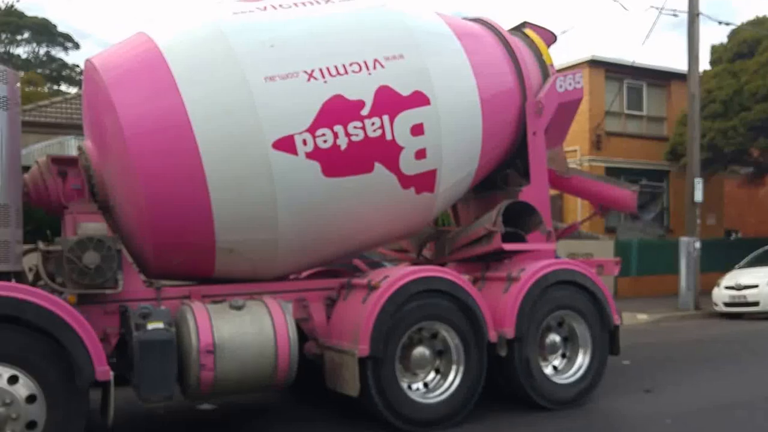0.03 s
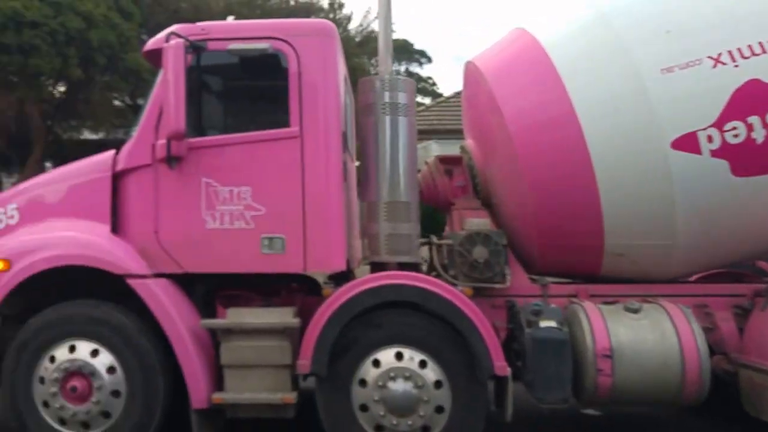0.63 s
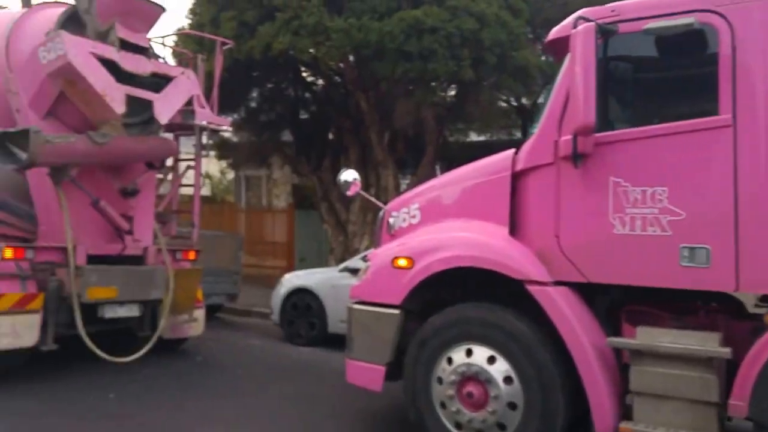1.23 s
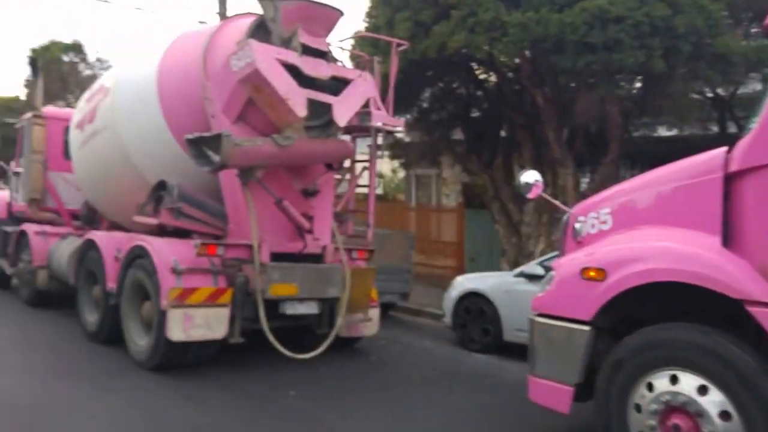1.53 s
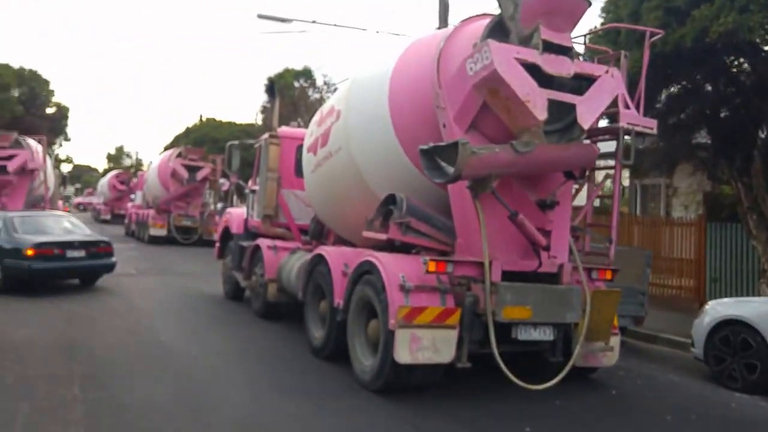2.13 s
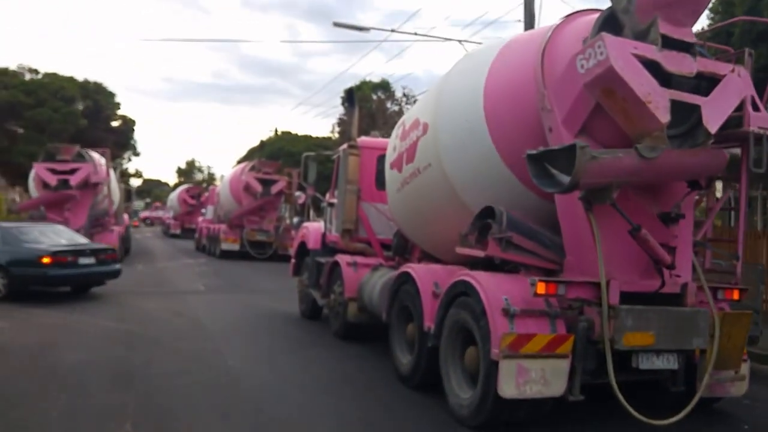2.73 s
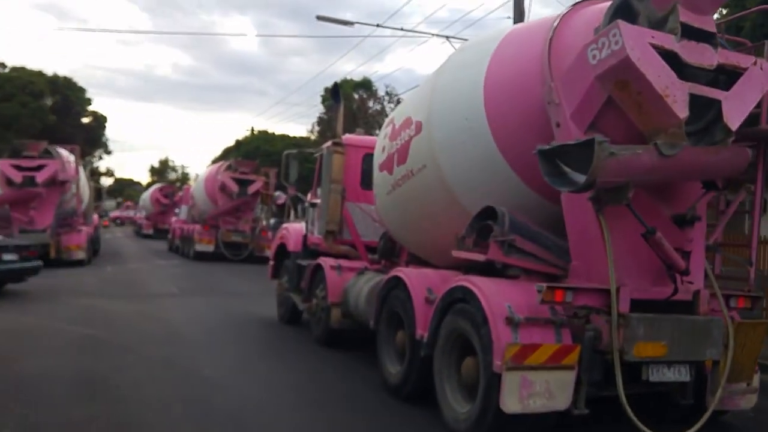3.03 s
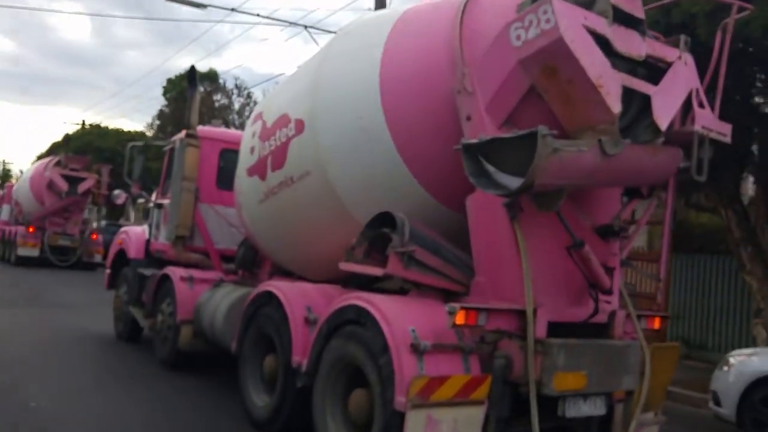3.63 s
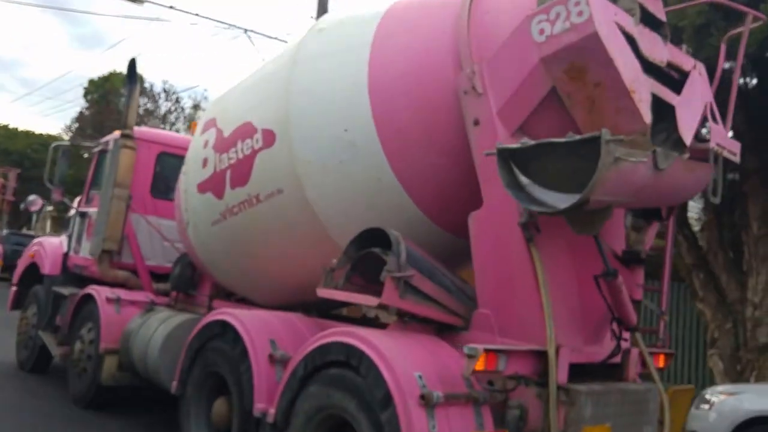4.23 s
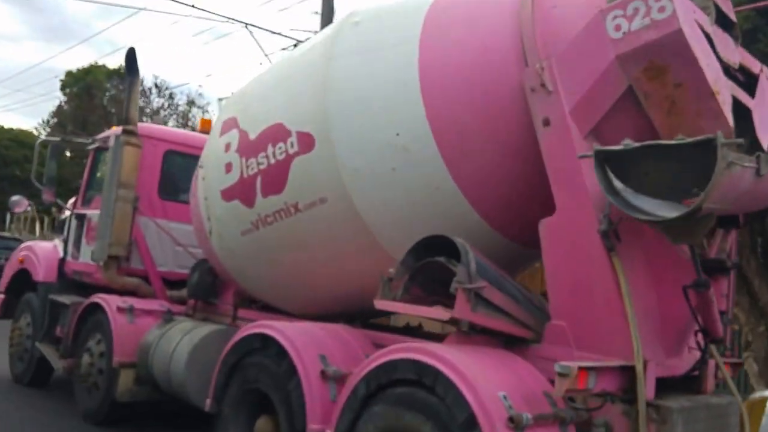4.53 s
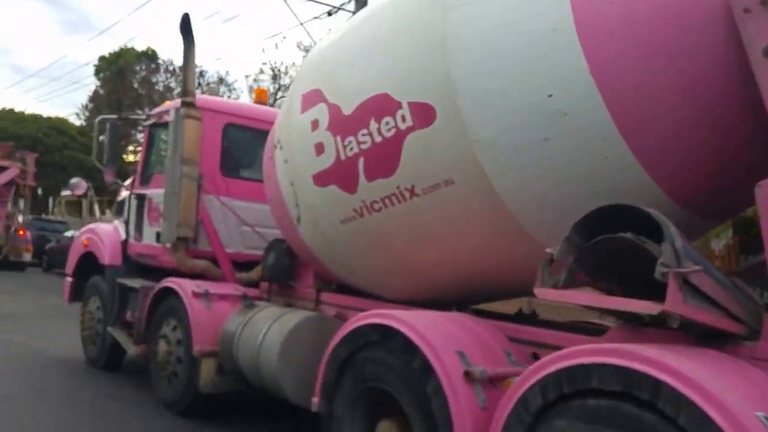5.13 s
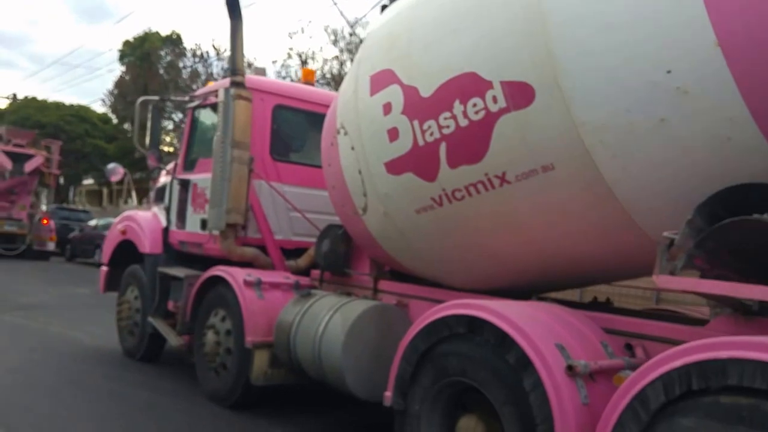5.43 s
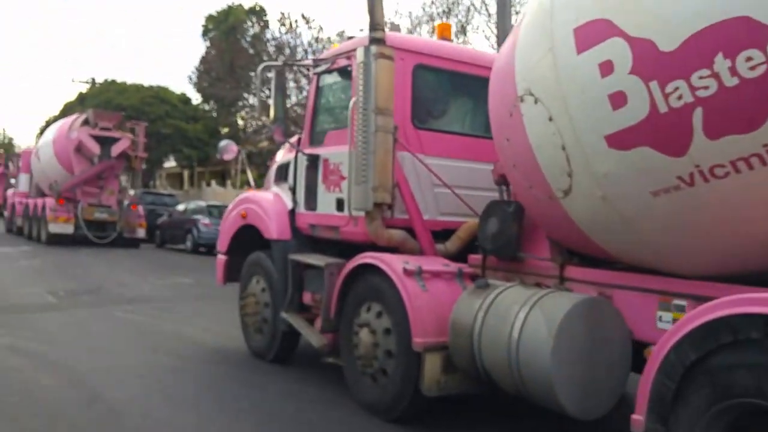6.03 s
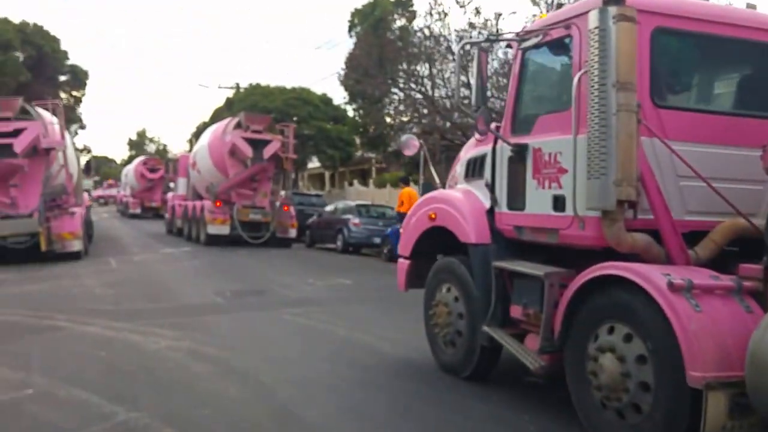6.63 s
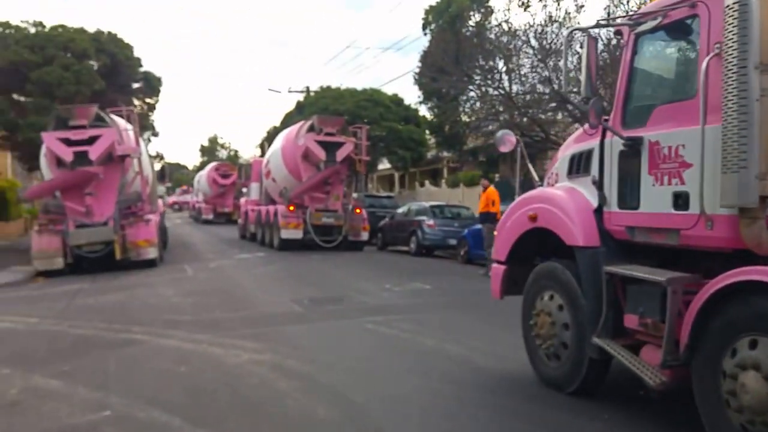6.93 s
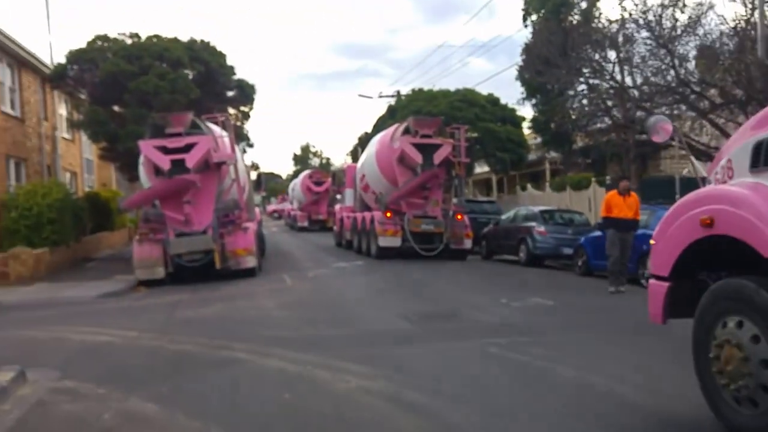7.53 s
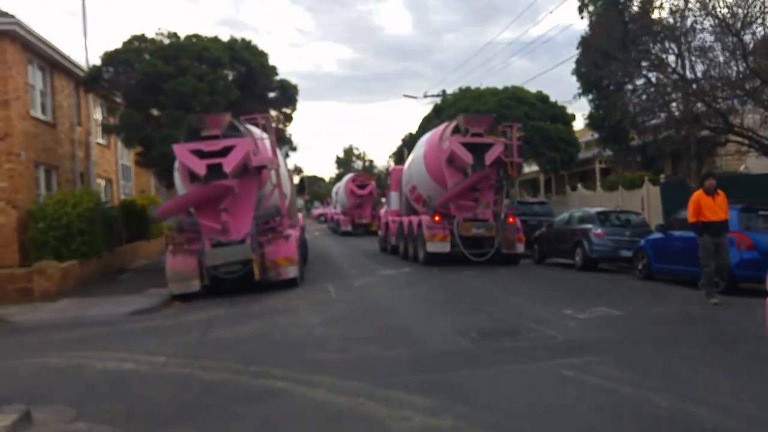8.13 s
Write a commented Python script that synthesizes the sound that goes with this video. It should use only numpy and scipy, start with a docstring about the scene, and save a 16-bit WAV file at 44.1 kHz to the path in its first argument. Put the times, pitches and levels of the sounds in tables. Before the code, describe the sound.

A row of concrete mixer trucks idles on a suburban street. After a brief silence, a steady low diesel drone and clatter fade in. The microphone moves slowly past two of them, so pump whines and fan hiss swell and recede. A few soft bumps and ticks come near the middle, then pulsing air hiss and deeper exhaust puffing. The engines ease slightly toward the end, with a faint metal squeak.

```python
"""Idling concrete mixer trucks

The microphone rolls slowly past two trucks of a row on a suburban street. Six-cylinder diesels drone
and clatter, drum drives and pumps whine in and out, fans and air hiss, metal squeaks briefly.
A few soft bumps and ticks reach the microphone; the sound fades in after a silent start."""
import sys
import numpy as np
from scipy import signal
from scipy.fft import rfft, irfft, next_fast_len
from scipy.io import wavfile

SR = 44100
rng = np.random.default_rng(int(sys.argv[2]) if len(sys.argv) > 2 else 0)


def file_out(sig):
    """Save sig as 16-bit WAV at sys.argv[1]."""
    # one column per channel
    cols = np.atleast_2d(sig).T
    # limit, then scale
    lim = np.clip(cols, -1, 1)
    pcm = np.round(lim * 32767).astype(np.int16)
    wavfile.write(sys.argv[1], SR, pcm)


N = 369558
T = np.arange(N) / SR
FFT_SIZE = next_fast_len(N, True)
BIN_HZ = np.maximum(np.arange(FFT_SIZE // 2 + 1) * SR / FFT_SIZE, 1)
FIRST_CRANK_HZ, SECOND_CRANK_HZ, FAR_CRANK_HZ = 10.11, 10.77, 11.64


def diesel(crank, decay_s, bed, rise_s=.0014, uneven_db=1, chance_db=1.8, repeat=.43):
    """Six firings in two turns rattle the block, partly alike each cycle. Returns rattle, envelope."""
    firing = (3 * crank).astype(int)
    since_s = (3 * crank % 1) / (3 * np.gradient(crank) * SR)
    weakness = unit_rms(signal.detrend(rng.standard_normal(6), type="constant"))
    chance = rng.standard_normal(firing[-1] + 1)
    strength = from_db(chance_db * chance[firing] - uneven_db * weakness[firing % 6])
    beat = unit_rms(bed + strength * (1 - np.exp(-since_s / rise_s)) * np.exp(-since_s / decay_s))
    cycle = rng.standard_normal(int(2 * N / (crank[-1] - crank[0])))
    repeating = cycle[(crank / 2 % 1 * len(cycle)).astype(int)]
    rattle = np.sqrt(repeat) * repeating + np.sqrt(1 - repeat) * rng.standard_normal(N)
    return beat * rattle, beat


# t/s, left lag of first truck/ms, of second/ms, power share of second
TRUCK_BEARINGS = [(.6, -0.08, -0.27, 0.27), (1.2, 0.24, -0.046, 0.47), (1.9, 0.47, -0.27, 0.03),
                  (3.2, 0.48, -0.078, 0.05), (4.7, 0.44, -0.17, 0.33), (6, 0.41, -0.011, 0.52),
                  (7, 0.51, 0.34, 0.83), (8.38, 0.43, 0.4, 0)]

def near_trucks(first, second):
    """Direct sound of two engines, shifting in bearing and balance."""
    first_ms, second_ms, share = curves(TRUCK_BEARINGS)
    return np.sqrt(1 - share) * lag_left(first, first_ms) + np.sqrt(share) * lag_left(second, second_ms)


def far_trucks():
    """The rest of the row and the echoes: two rattles from all sides."""
    rattles = [diesel(turns(hz), decay_s=.0044, bed=2.7)[0] for hz in (FAR_CRANK_HZ, FIRST_CRANK_HZ)]
    return diffuse(np.array(rattles))


# Loudness along the row: t/s, level/dB
ROW_LOUDNESS = [(0.83, -19), (1.8, -17), (2.7, -21.5), (3.2, -19), (4.0, -19.5), (5.5, -20), (6.3, -18.5),
                (6.95, -20.5), (7.3, -25.5), (7.9, -21), (8.38, -23.5)]

def engine_gain(mean_db, follow):
    """Gain that follows a share of the loudness swing along the row."""
    row_db, = curves(ROW_LOUDNESS)
    return from_db(mean_db + follow * (row_db - row_db.mean()))


# f/Hz, level/dB
ROAR_SPECTRUM = [(400, -64), (520, -19), (560, -6), (600, -1), (670, 2), (730, 1), (790, 2.5), (860, 0.5),
                 (950, -1.5), (1100, -5), (1300, -20), (1800, -37)]

def panel_roar(direct, street, beat, pulse=.65):
    """Panels roar; the echoed part pulses with the firing."""
    echo = street * (1 + pulse * (beat - 1))
    return engine_gain(-22, follow=.86) * coloured(echo + .85 * direct, ROAR_SPECTRUM)


# f/Hz, level/dB
RUMBLE_SPECTRUM = [(90, -22.5), (170, -16.5), (205, -3.5), (255, -8.5), (310, -4), (350, -2.5), (420, -2),
                   (470, -7.5), (515, -11), (600, -31)]

def block_rumble(direct, street):
    """Low rattle of the engine blocks."""
    return engine_gain(-27.5, follow=.97) * coloured(street + .56 * direct, RUMBLE_SPECTRUM)


# f/Hz, level/dB
KNOCK_SPECTRUM = [(900, -38), (1200, -5.5), (1400, -2.5), (1650, 0.5), (1900, 1.5), (2200, -1.5),
                  (2600, -3.5), (3000, -11.5), (3300, -12), (3700, -20.5), (4500, -21), (7000, -24)]
# t abreast/s, half-length/s, boost/dB
OPEN_ARCHES = [(1.033, 0.53, 3.5), (6.05, 0.81, 1.5)]

def injector_knock(direct, street):
    """Injectors knock, louder abreast of an open wheel arch."""
    arch_db = sum(db * nearness(T, at_s, half_s) for at_s, half_s, db in OPEN_ARCHES)
    return engine_gain(-28.5 + arch_db, follow=.59) * coloured(street + .75 * direct, KNOCK_SPECTRUM)


# f/Hz, width/Hz, far level/dB, passes (t/s, half-length/s, level/dB)
COVER_MODES = [(1610, 35, -68, [(1.0, 0.26, -43.5)]), (1805, 42, -53, [(3, 0.8, -44.5), (4.95, 0.63, -38.5),
               (5.88, .17, -34.5), (6.45, 0.26, -37.5), (8, .45, -40)]), (2074, 30, -55, [(.94, .22, -31.5),
               (1.84, .19, -35.5), (3.3, 0.36, -43.5)]), (4700, 80, -70, [(.95, .12, -42),
               (1.72, .15, -47)])]
BODY_SHADOW = 9.3  # steepness of hiding by bodywork; 2 = in the open

def cover_rings(clatter):
    """Engine covers ring at their own pitches under the clatter."""
    out = np.zeros((2, N))
    for hz, width_hz, far_db, passes in COVER_MODES:
        mode = signal.iirpeak(hz, hz / width_hz, fs=SR)
        ring = signal.lfilter(*mode, signal.lfilter(*mode, clatter))
        out += passing(far_db, passes, BODY_SHADOW) * unit_rms(ring)
    return out


# crank order, relative level/dB
EXHAUST_ORDERS = [(3, -25), (4, -7), (5, -20), (6, 5), (7, -28), (8, -26.5), (9, -4), (10, -26), (12, -5),
                  (13, -27), (15, -10.5), (19, -14)]

def exhaust_drone(crank, waver=.029):
    """Low crank orders, nearly pure, wavering as reflections shift."""
    tones = sum(from_db(db) * (1 + waver * drift(1.1)) * np.cos(2 * np.pi * (k * crank + rng.random()))
                for k, db in EXHAUST_ORDERS)
    return passing(-45.5, [(2.4, 2, -40), (8.3, .76, -36)]) * np.sqrt(2) * tones


# f/Hz, level/dB
PUFF_SPECTRUM = [(22, -24), (42, 3.5), (60, -8), (90, -1), (130, -9.5), (180, -12), (300, -14)]

def exhaust_puffs(direct, street):
    """Deep, noisy puffing of exhaust gas."""
    gas = street + .16 * direct + .51 * rng.standard_normal((2, N))
    return passing(-39, [(4.8, .45, -39), (6.3, .52, -30)]) * coloured(gas, PUFF_SPECTRUM)


# Idle surges: depth/share of speed, period/s, crest t/s
QUICK, SLOW = (.0055, .527, 4.8), (.0035, .73, 1.75)
# f/Hz, unsteady share, width/Hz, left lag/ms, far level/dB, surge, passes (t/s, half-length/s, level/dB)
WHINE_TONES = [(202.7, .2, 3, -.1, -43.5, SLOW, [(1.1, 0.44, -37), (4.8, .8, -36)]),
               (232.6, 0.15, 3, -0.18, -37, QUICK, [(3.6, 0.48, -33.5), (4.44, 0.27, -27),
               (5.55, 0.45, -26.5), (5.82, 0.19, -24.5), (6.27, 0.24, -29), (8.05, 0.18, -34.5)]),
               (304, 0.2, 4, -0.18, -49, SLOW, [(1.85, 0.55, -33)]),
               (311.4, 0.16, 4, -0.11, -42, SLOW, [(5.1, 1, -39.5)]),
               (393.4, 0.07, 5, 0.37, -42, QUICK, [(2.35, 0.29, -28), (3.5, 0.69, -26.5),
               (4.85, 0.26, -28.5), (6.3, 0.62, -33)]),
               (405.8, 0.1, 5.6, 0.48, -42, SLOW, [(1.5, 0.83, -31), (3.3, 0.77, -30), (5.4, 1.4, -33)]),
               (433, .25, 5, 0.44, -52, SLOW, [(3.7, 1.8, -38)]),
               (463.5, 0.061, 3.4, 0.41, -35, QUICK, [(.88, 0.097, -28), (1.38, 0.15, -31),
               (2, 0.24, -31.5), (2.6, 0.21, -27.5), (4.45, 0.53, -34), (5.35, 0.34, -29),
               (6.65, 0.28, -30.5), (7.42, 0.42, -26.5), (8.33, 0.17, -30.5)]),
               (497, 0.21, 5, 0.61, -54, QUICK, [(6.75, 0.29, -35), (8, 0.15, -35.5)]),
               (608.7, 0.24, 3.5, 0.29, -40, SLOW, [(1.15, 0.41, -32), (1.8, 0.28, -30), (3.15, 0.49, -31),
               (4.55, 0.13, -34)]), (635, 0.4, 6.9, 0.31, -42, QUICK, [(6.9, 0.21, -32), (8.3, 0.1, -30)]),
               (666, 0.26, 10, 0.27, -34.5, QUICK, [(5.35, 0.32, -31), (6.55, 0.28, -27.5),
               (7.65, 0.14, -32)]), (701, 0.28, 4.5, 0.13, -40, QUICK, [(3.42, 0.15, -29.5),
               (4.8, 0.11, -28), (5.9, 0.56, -36), (6.92, 0.11, -26)]),
               (785, 0.26, 6.1, 0.13, -52, SLOW, [(1.1, 0.47, -28.5)]),
               (811.5, 0.17, 6.5, 0.32, -42, SLOW, [(1.25, 0.28, -26.5), (2.3, 0.81, -22),
               (4.35, 0.31, -27), (4.95, 0.15, -28.5), (6.1, 0.38, -33), (6.6, 0.085, -31)]),
               (900, 0.06, 3.9, 0.25, -43, QUICK, [(2.05, 0.47, -34.5), (5.5, 0.97, -29.5)]),
               (4240, 1, 110, 0.24, -68, QUICK, [(6.72, 0.14, -43)]),
               (5230, 1, 59, 0.19, -61, QUICK, [(7.4, 0.5, -48.5)])]

def whines(crank, flutter_rad=.43, fading_db=1.8, fading_hz=.92):
    """Pump, gear and fan tones, shaken by the engine cycle; reflections make far ones fade in and out."""
    out = np.zeros((2, N))
    for hz, unsteady, width_hz, lag_ms, far_db, surge, passes in WHINE_TONES:
        gain = passing(far_db, passes, BODY_SHADOW)
        gain *= from_db(fading_db * (1 - gain / gain.max()) * drift(fading_hz))
        reflections = unit_rms(drift(width_hz) + 1j * drift(width_hz))
        amplitude = np.sqrt(1 - unsteady ** 2) + unsteady * reflections
        phase = 2 * np.pi * turns(hz * whine_pitch(surge, passes), hunting=.00097)
        phase += flutter_rad * np.sin(np.pi * crank + 2 * np.pi * rng.random())
        tone = np.sqrt(2) * gain * amplitude * np.exp(1j * phase)
        sway = .23 * min(hz / 1000, 1) * drift(2)
        left = tone * np.exp(-2j * np.pi * hz * lag_ms / 1000)
        out += [left.real * (1 + sway), tone.real * (1 - sway)]
    return out


def whine_pitch(surge, passes, doppler_shift=.0035, doppler_s=1.2):
    """Relative pitch: surges with the engine, bends down through the loudest pass."""
    depth, period_s, crest_s = surge
    abreast_s = max(passes, key=lambda row: row[2])[0]
    past = (T - abreast_s) / doppler_s
    doppler = doppler_shift * 2 * past / (1 + past ** 2)
    return 1 + depth * np.cos(2 * np.pi * (T - crest_s) / period_s) - doppler


def airflow(beat, pulse=.48, flicker_db=.88):
    """Diffuse air noise, pulsing gently with the firing."""
    noise = diffuse(rng.standard_normal((2, N)))
    return noise * (1 + pulse * (beat - 1)) * from_db(flicker_db * drift(13))


# f/Hz, level/dB
HISS_SPECTRUM = [(2500, -3), (3300, -5), (3700, -5.5), (4600, -3.5), (5600, -2.5), (6600, -2.5),
                 (7400, -1.5), (7750, -10.5), (8200, -8.5), (9200, -21.5), (11000, -50)]
SPRAY_SPECTRUM = [(6000, -19), (8500, 1), (9700, 0.5), (11000, -2.5), (13000, -5.5), (16000, -10)]

def fans(air, direct):
    """Fan hiss with reflections, topped by a fainter, brighter spray of noise."""
    gain = passing(-34, [(1.05, .45, -32), (1.8, .56, -33), (6.68, .27, -30), (8.15, 1, -33.5)])
    hiss = with_reflections(coloured(air + .055 * direct, HISS_SPECTRUM))
    spray = from_db(-9) * coloured(air + .34 * direct, SPRAY_SPECTRUM)
    return gain * (hiss * pan(.8) + spray * pan(-1))


# f/Hz, level/dB
JET_SPECTRUM = [(4500, -14), (5500, -7), (6500, 0.5), (7400, -1.5), (7800, -13), (9000, -14)]
# t/s, half-length/s, level/dB
COMPRESSOR_PASSES = [(3.75, 0.12, -35), (4.5, 0.86, -33), (5.33, 0.1, -33), (5.95, 0.44, -35.5),
                     (6.3, 0.13, -33.5)]

def compressor_jet(crank, surge_db=2.4):
    """An air jet surges once a turn with the compressor stroke."""
    stroke = from_db(surge_db * np.cos(2 * np.pi * crank) + .5 * drift(11))
    return passing(-56, COMPRESSOR_PASSES) * stroke * coloured(rng.standard_normal((2, N)), JET_SPECTRUM)


# f/Hz, level/dB
LEAK_SPECTRUM = [(9500, -20), (11300, -1), (13000, 0), (14200, -4), (16000, -7)]

def air_leak(air):
    """Thin sizzle of air escaping behind the second cab."""
    return passing(-75, [(5.85, .22, -56), (6.3, .12, -50)]) * coloured(air, LEAK_SPECTRUM)


# t/s, level/dB, f/Hz, half-length/s, left minus right/dB
MIC_JOLTS = [(2.809, -24, 76, 0.0067, -16), (3.339, -22, 232, 0.014, 0), (3.551, -10, 120.7, 0.0095, 3),
             (3.592, -22, 130, 0.0071, 2), (3.987, -11.5, 98, 0.0038, 8), (4.012, -18, 70, 0.011, -2),
             (4.065, -24, 85, 0.022, -2), (4.117, -22, 105, 0.0083, 3)]

def bumps():
    """Soft jolts of the microphone: a low swing of a cycle or two."""
    out = np.zeros((2, N))
    for at_s, db, hz, half_s, pan_db in MIC_JOLTS:
        near = np.abs(T - at_s) < .1
        t = T[near] - at_s
        out[:, near] += from_db(db) * pan(pan_db) * np.exp(-(t / half_s) ** 2) * np.cos(2 * np.pi * hz * t)
    return out


# t/s, level/dB, f/Hz, half-length/s, relative half-bandwidth; puffs of air, and at 8.22 s a brief rattle
NOISE_BURSTS = [(1.17, -27.5, 7260, 0.011, .25), (1.19, -29, 8100, .003, .08),
                (4.552, -27, 7200, 0.0064, .045), (4.639, -23, 7200, .004, 0.044),
                (4.733, -25, 7100, 0.0058, 0.065), (3.27, -35.5, 5000, 0.11, 0.32),
                (6.232, -30, 7300, 0.018, 0.39), (6.3, -41, 3950, .13, .04), (7.868, -29, 4600, 0.0089, 0.17),
                (8.12, -42, 3600, 0.16, .06), (8.22, -31.5, 2580, 0.079, .14)]
# t/s, level/dB
DRY_TICKS = [(3.170, -35), (3.380, -26), (3.503, -33), (3.671, -27)]

def spits_and_ticks(tick_hz=12400, tick_half_s=.0005):
    """Short puffs of air, a brief rattle and tiny dry ticks: bursts of band noise."""
    out = np.zeros((2, N))
    ticks = [(at_s, db, tick_hz, tick_half_s, .14) for at_s, db in DRY_TICKS]
    for at_s, db, hz, half_s, width in list(NOISE_BURSTS) + ticks:
        near = np.abs(T - at_s) < .2
        band = signal.butter(2, hz * np.exp([-width, width]), "band", fs=SR, output="sos")
        noise = unit_rms(signal.sosfilt(band, rng.standard_normal((2, near.sum()))))
        out[:, near] += from_db(db) * np.exp(-((T[near] - at_s) / half_s) ** 2) * noise
    return out


# t/s, f/Hz, half-length/s, level/dB
METAL_SQUEAKS = [(.712, 8330, .042, -31.5), (7.78, 9030, .025, -43), (7.98, 350, .14, -29)]

def squeaks():
    """Metal squeaks and groans in brief, wavering tones."""
    clock_s = np.cumsum(1 + .0028 * drift(32)) / SR
    return sum(from_db(db) * np.exp(-((T - at_s) / half_s) ** 4) * np.sin(2 * np.pi * hz * clock_s)
               for at_s, hz, half_s, db in METAL_SQUEAKS)


def turns(hz, hunting=.002):
    """Running turn count under a governor that hunts a little."""
    return np.cumsum(hz * (1 + hunting * drift(.8))) / SR + 2 * rng.random()


def nearness(t, at_s, half_s, shadow=2):
    """Gain of a passed machine: 1 abreast, one half at half_s either side."""
    return 1 / (1 + np.abs((t - at_s) / half_s) ** shadow)


def passing(far_db, passes, shadow=2):
    """Gain: the far level and each pass (t/s, half-length/s, level/dB) add in power."""
    t = T[::100]
    swells = sum((from_db(db) * nearness(t, at_s, half_s, shadow)) ** 2 for at_s, half_s, db in passes)
    return np.interp(T, t, np.sqrt(from_db(far_db) ** 2 + swells))


def with_reflections(pair, gain=.25, detour_s=.003, sway=.1158):
    """Road and truck flank reflect; the detours change as the microphone moves."""
    delays_s = [detour_s * path * (1 + sway * drift(.3)) for path in (1, 2.3)]
    echoes = np.array([sum(np.interp(T - delay, T, port) for delay in delays_s) for port in pair])
    return unit_rms(pair + gain * echoes)


def diffuse(pair, port_spacing_s=.00053):
    """Sound from all sides: alike at both microphone ports only for long waves."""
    alike = np.sinc(2 * BIN_HZ * port_spacing_s)
    mid, side = irfft(rfft(pair, FFT_SIZE) * np.sqrt([1 + alike, 1 - alike]), FFT_SIZE)[:, :N]
    return unit_rms(np.array([mid + side, mid - side]))


def lag_left(x, lag_ms):
    """Stereo pair with the left port delayed."""
    return np.array([np.interp(T - lag_ms / 1000, T, x), x])


def pan(left_minus_right_db):
    """Left and right gains."""
    return from_db(np.array([[.5], [-.5]]) * left_minus_right_db)


def coloured(x, spectrum):
    """Filter by an (f/Hz, level/dB) table; unit power."""
    hz, db = np.transpose(spectrum)
    gain = from_db(np.interp(np.log(BIN_HZ), np.log(hz), db, left=-80, right=-80))
    return unit_rms(irfft(rfft(x, FFT_SIZE) * gain, FFT_SIZE)[..., :N])


def drift(hz, hop=100, settle=1000):
    """Random wander of spread 1, changing about hz times a second."""
    pole = np.exp(-2 * np.pi * hz * hop / SR)
    noise = rng.standard_normal(N // hop + settle + 2)
    slow = signal.lfilter([1], [1, -2 * pole, pole * pole], noise)[settle:]
    return np.interp(np.arange(N) / hop, np.arange(len(slow)), unit_rms(slow))


def curves(rows):
    """Columns of a (t/s, ...) table, per sample."""
    times_s, *columns = np.transpose(rows)
    return [np.interp(T, times_s, column) for column in columns]


def from_db(db):
    return 10 ** (np.asarray(db) / 20)


def unit_rms(x):
    return x / np.sqrt(np.mean(np.abs(x) ** 2) + 1e-20)


def scene():
    """Two near diesels heard directly, the rest of the row and its echoes from every side."""
    crank = turns(SECOND_CRANK_HZ)
    first, first_beat = diesel(turns(FIRST_CRANK_HZ), decay_s=.0099, bed=.9)
    second, second_beat = diesel(crank, decay_s=.0048, bed=1)
    direct = near_trucks(first, second)
    street = far_trucks()
    air = airflow(second_beat)
    jet = compressor_jet(crank)
    low_end = exhaust_puffs(direct, street) + block_rumble(direct, street)
    clatter = panel_roar(direct, street, first_beat) + injector_knock(direct, street)
    clatter += cover_rings(street + direct)
    hiss = jet + fans(air, direct) + air_leak(air)
    tones = exhaust_drone(crank) + whines(crank) * pan(2.2)
    return clatter * pan(1.8) + low_end + tones + hiss + bumps() + spits_and_ticks() + squeaks()


def record(dry, hollow_hz=524, bass_leak_hz=241, start_s=.57, fade_s=.26, cutoff_hz=15800):
    """A close reflection hollows one band, the left port leaks bass; fade-in, top cut."""
    left, right = signal.lfilter(*signal.iirnotch(hollow_hz, Q=11.3, fs=SR), dry)
    left = signal.sosfilt(signal.butter(1, bass_leak_hz, "high", fs=SR, output="sos"), left)
    fade = (T > start_s) * np.clip(.089 + (T - start_s) / fade_s, 0, 1)
    lowpass = signal.ellip(12, .1, 80, cutoff_hz, fs=SR, output="sos")
    return signal.sosfilt(lowpass, fade * np.array([left, right]) + 1e-18)


dry = scene()
out = record(dry)
file_out(out)
```